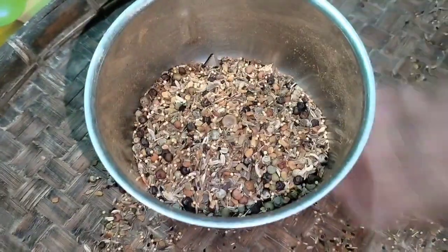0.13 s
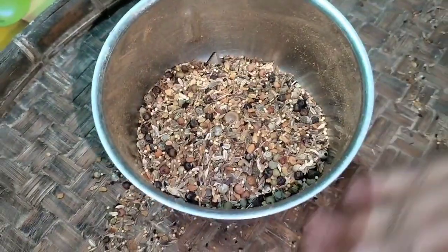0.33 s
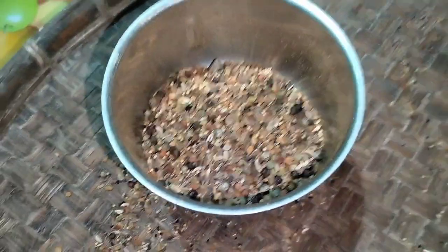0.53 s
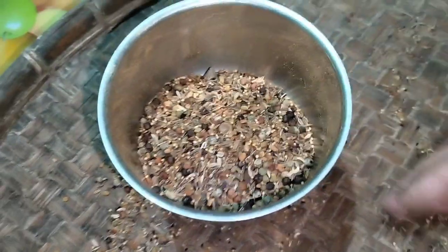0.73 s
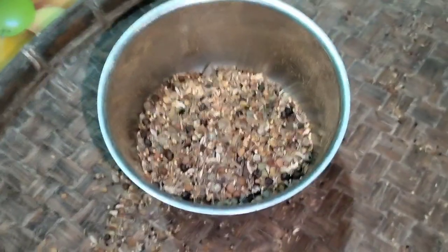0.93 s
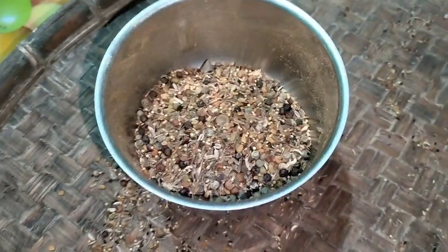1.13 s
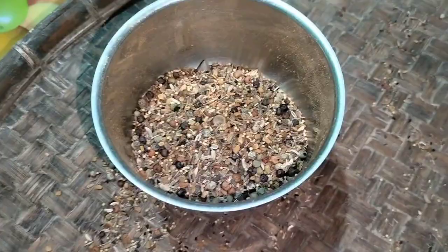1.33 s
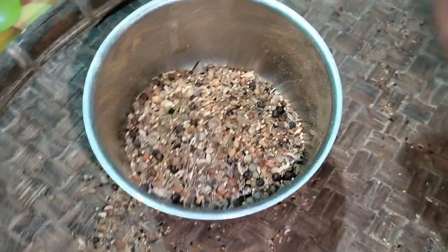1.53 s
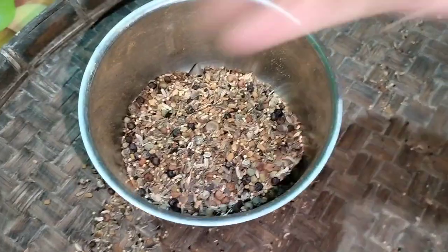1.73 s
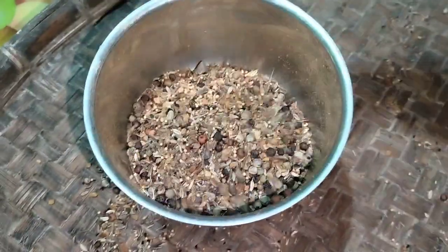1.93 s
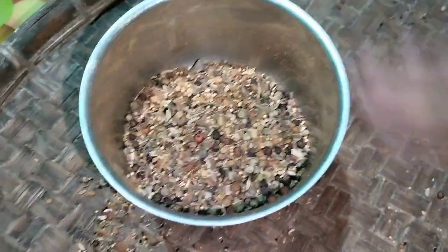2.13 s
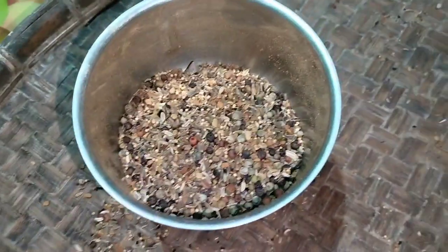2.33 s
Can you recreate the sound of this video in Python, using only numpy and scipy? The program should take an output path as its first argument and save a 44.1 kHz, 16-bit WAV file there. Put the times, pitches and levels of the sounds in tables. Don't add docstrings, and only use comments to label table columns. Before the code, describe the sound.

Dry seeds rustle and scrape in three hand strokes over a woven bamboo tray, stray seeds roll and click, a pinch patters into a ringing steel cup, then another sweep; close stereo in a quiet kitchen.

```python
import sys
import numpy as np
from scipy import signal
from scipy.fft import rfft, irfft
from scipy.io import wavfile
from scipy.ndimage import map_coordinates

SR = 44100
rng = np.random.default_rng(int(sys.argv[2]) if len(sys.argv) > 2 else 0)


def attenuation_scalar(level_db):
    decades = np.asarray(level_db, float) / 20
    return 10 ** decades


def generate_wav(signal):
    frames = np.transpose(np.atleast_2d(signal))
    scaled = np.clip(frames, -1, 1) * 32767
    pcm = np.round(scaled).astype(np.int16)
    wavfile.write(sys.argv[1], SR, pcm)


N = 110117

# (pitch_hz, width_hz, boost_db)
HOLLOWS = [(2470, 320, 4.5), (3920, 670, 8), (5810, 1030, 4.5), (6950, 500, 0.5)]
# (pitch_hz, level_db, time_to_fall_60_db_s)
TRAY_TONES = [(126.7, -7.5, 0.37), (165, 1.5, 0.16), (228, 3, 0.21), (249, -4.5, 0.16), (281, 5, 0.11),
              (353.5, -4, 0.088), (434, -5, 0.072)]
# (pitch_hz, level_db, time_to_fall_60_db_s)
STRIP_TONES = [(573, -3, 0.035), (698, 2.5, 0.065), (859, -5.5, 0.042), (946, 9, 0.046),
               (1065, -6.5, 0.029), (1707, -4, 0.067)]
LEFT_LAG_S = 0.0003


def unit(x):
    return x / np.sqrt(np.mean(x ** 2) + 1e-20)


def along(points, hz):
    f, value = np.transpose(points)
    return np.interp(np.log(hz + 1), np.log(f + 1), value)


def curves(rows):
    time_s, *columns = np.transpose(rows)
    return [np.interp(np.arange(N) / SR, time_s, column, -120, -120) for column in columns]


def wobble(rate):
    knots = rng.standard_normal(int(N * rate / SR) + 4)
    return map_coordinates(knots, [np.arange(N) * rate / SR])


def coloured(x, spectrum, bumps=()):
    hz = np.fft.rfftfreq(4096, 1 / SR)
    db = np.maximum(along(spectrum, hz), -70)
    db = db + sum(boost / (1 + (2 * (hz - centre) / width) ** 2) for centre, width, boost in bumps)
    fold = np.r_[1, 2 * np.ones(2047), 1, np.zeros(2047)]
    cepstrum = irfft(db * np.log(10) / 20) * fold
    response = irfft(np.exp(rfft(cepstrum)))[None, :2048]
    return signal.fftconvolve(x, response, axes=1)[:, :N]


def ringing(modes, attack_s=0.00049):
    t = np.arange(SR // 2) / SR
    ring = np.zeros(len(t))
    for k, (hz, db, t60) in enumerate(modes):
        ring += (-1) ** k * attenuation_scalar(db - 60 * t / t60) * np.sin(2 * np.pi * hz * t)
    return ring * (1 - np.exp(-t / attack_s))


def rung(x, modes):
    return signal.fftconvolve(x, ringing(modes)[None], axes=1)[:, :N]


def contacts(count, spread_db, lag_s=LEFT_LAG_S):
    u = rng.random((count, 4))
    size = attenuation_scalar(-spread_db * np.log(u[:, 1] + 1e-3)) * np.sign(u[:, 2] - 0.5)
    lag = lag_s + 0.0001 * np.tan(2.4 * (u[:, 3] - 0.5))
    both = []
    for delay in (lag, 0 * lag):
        at = np.clip(np.round(u[:, 0] * N + delay * SR).astype(int), 0, N - 1)
        both.append(np.bincount(at, size, N))
    return unit(np.array(both))


def sweep():
    # (time_s, rustle_db, drumming_over_rustle_db, scrape_over_rustle_db)
    strokes = [
        [(0.0, -48.5, -15.5, -11.5), (0.246, -30.5, -8.5, -3), (0.44, -59.5, -7.5, -10)],
        [(0.45, -48.5, -14.5, -8), (0.652, -30, -12, -3.5), (0.85, -51.5, -12, -8)],
        [(0.86, -43, -10, -5.5), (1.08, -32, -1.5, -2), (1.38, -66, -21, -13)],
        [(2.2, -56, -17, -17), (2.286, -37, -10.5, -4), (2.496, -38.5, -5.5, -4.5)],
    ]
    # (pitch_hz, level_db)
    rustle_tone = [(710, -37.5), (1200, -2.5), (1980, -4.5), (2560, -2), (4650, -5), (5840, -6), (7170, -4),
                   (9610, -20), (16000, -23)]
    # (pitch_hz, level_db)
    scrape_tone = [(210, -10.5), (350, -10), (480, -6.5), (861, -2.5), (2200, -12.5), (2860, -30),
                   (4840, -120)]
    db, drum_db, scrape_db = curves(np.concatenate(strokes))
    hand_lifted = np.abs(np.arange(N) / SR - 1.78) < 0.4
    db = np.where(hand_lifted, -120, db)
    weave_db = 2.15 * wobble(15) + 1.11 * wobble(45)

    rustle = unit(coloured(contacts(count=40000, spread_db=2.0), rustle_tone, HOLLOWS))
    rustle = attenuation_scalar(db + weave_db + 3.5) * rustle

    rub = contacts(count=9000, spread_db=3.0, lag_s=0.0001)
    scrape = unit(unit(coloured(rub, scrape_tone)) + 0.67 * unit(rung(rub, STRIP_TONES)))
    scrape = attenuation_scalar(db + scrape_db + weave_db + 1.5 * wobble(30.1) + 1.5) * scrape

    push = contacts(count=1500, spread_db=0.5, lag_s=0.00005)
    push = attenuation_scalar(db + drum_db + 1.9 * wobble(18)) * push
    drum = rung(push, TRAY_TONES) / np.linalg.norm(ringing(TRAY_TONES))
    return rustle + scrape + attenuation_scalar(0.5) * drum


def pour():
    # (time_s, level_db)
    trickle = [
        (1.96, -66.5),
        (2.048, -40.5),
        (2.22, -62.5),
    ]
    # (pitch_hz, level_db)
    patter_tone = [(1800, -51), (2600, -21), (4500, -9), (7200, 1.5), (8500, -6), (9500, -17),
                   (12000, -10.5), (16000, -11.5)]
    # (pitch_hz, level_db, time_to_fall_60_db_s)
    cup_tones = [(2326, 7, .4), (2420, 4.5, 0.32), (2410, -20, .3), (2682, -5, 0.46), (3360, -1, 0.33),
                 (3790, -4.5, 0.29), (4180, -19, 0.35), (4290, 5.5, 0.24), (4980, -3.5, 0.44),
                 (5556, -2, 0.26), (5960, 3.5, 0.36), (6169, -17, 0.42), (6750, -1, 0.2), (7300, -12, .25)]
    db, = curves(trickle)
    hits = attenuation_scalar(db + 1.8 * wobble(40)) * contacts(count=20000, spread_db=3.5)
    steady = contacts(count=20000, spread_db=4)
    patter = coloured(hits, patter_tone) / np.std(coloured(steady, patter_tone))

    weak_hz = np.sort(rng.uniform(3000, 8800, size=36))
    wall = cup_tones + [(hz, -19 + rng.normal(0, 5.3), 0.22) for hz in weak_hz]
    ring = coloured(rung(hits, wall), [(1700, -27), (2250, 2)]) / np.linalg.norm(ringing(wall))

    pan_db = np.clip(-4.5 + 42 * (np.arange(N) / SR - 2), -9, 9)
    return (attenuation_scalar(-1.5) * patter + attenuation_scalar(0.5) * ring) * attenuation_scalar(pan_db * np.array([[0.5], [-0.5]]))


def rolling():
    # (time_s, level_db)
    roll_level = [
        (1.3, -53.5),
        (1.624, -62),
        (1.97, -86.5),
    ]
    # (pitch_hz, level_db)
    roll_tone = [(710, -56), (1200, -25), (2250, -37), (2320, -19), (3700, -5.5), (4310, -8), (16000, -28)]
    db, = curves(roll_level)
    tumble = unit(coloured(contacts(count=9000, spread_db=1.5), roll_tone, HOLLOWS))
    return attenuation_scalar(db + 0.73 * wobble(36.8) + 2.0) * tumble


def clicks():
    # (start_s, peak_db, dullness_0_to_1)
    landings = [(0.0658, -22, 0.2), (0.4914, -22.5, 0.38), (1.1394, -17.5, 0.63), (1.2625, -27.5, 0.35),
                (1.4002, -35.5, 0.4), (1.4245, -36, 0.2), (1.4566, -31.5, 0.16), (1.485, -35, 0.18),
                (1.524, -38, 0.03), (1.5433, -35.5, 0.02), (1.6654, -63, 0.47), (1.7045, -48, 0),
                (1.7214, -46, 0), (1.73, -23.5, 0.18), (1.8018, -44, 0.03), (1.8653, -30.5, 0.22),
                (1.9733, -53.5, 0), (1.984, -41, 0.15), (2.4163, -21.5, 0.35)]
    # (pitch_hz, level_db)
    tick_tone = [(500, -27), (850, -15), (1700, -15.5), (4200, 1), (7000, 1), (9000, -14.5), (12000, -29.5),
                 (16000, -26)]
    x = np.zeros((2, N + SR))
    t = np.arange(SR // 20) / SR
    for start_s, db, dull in landings:
        rattle = 0.2 * rng.standard_normal(len(t) - 1) * attenuation_scalar(-60 * t[1:] / 0.03)
        tick = np.r_[1, rattle]
        soft = 6 * signal.lfilter(*signal.butter(2, 2600, fs=SR), tick)
        tick = np.clip(1 - dull, 0, 1) * tick + np.clip(dull, 0, 1) * soft
        for side, lag in enumerate((LEFT_LAG_S, 0)):
            x[side, round((start_s + lag) * SR):][:len(t)] += attenuation_scalar(db) * tick
    one = np.zeros((1, N))
    one[0, 0] = 1
    return attenuation_scalar(1.5) * coloured(x[:, :N], tick_tone) / np.abs(coloured(one, tick_tone)).max()


def varied(modes):
    return [(hz, db + rng.normal(0, 2.44), t60) for hz, db, t60 in modes]


def knocks():
    # (start_s, peak_db, hardness_db), a hard knock rings the strips more
    taps = [(0.103, -29.5, 5), (0.872, -49, -13), (1.129, -24.5, 2), (1.259, -45.5, -10), (1.359, -54, -4),
            (1.437, -40, -14), (1.519, -52, -10.5), (1.58, -53.5, -21), (2.121, -44.5, 6.5),
            (2.2, -40.5, -11), (2.253, -36, 8), (2.459, -20, -0.5)]
    x = np.zeros(N + SR)
    for start_s, db, hard_db in taps:
        ring = ringing(varied(TRAY_TONES), 0.004)
        ring = ring + attenuation_scalar(hard_db) * ringing(varied(STRIP_TONES), 0.00063)
        x[round(start_s * SR):][:len(ring)] += attenuation_scalar(db - 11.5) * ring
    return x[:N] * attenuation_scalar([[0.8], [-0.8]])


def room(x):
    # (pitch_hz, time_to_fall_60_db_s)
    echo_time = [(200, 0.25), (1500, 0.31), (5000, 0.47), (12000, 0.05)]
    hz, t, z = signal.stft(rng.standard_normal((2, SR // 2)), SR, nperseg=256)
    fade = attenuation_scalar(-60 * t / along(echo_time, hz)[:, None])
    tail = signal.istft(z * fade, SR, nperseg=256)[1][:, :SR // 2]
    t = np.arange(SR // 2) / SR
    scatter = np.diff(rng.standard_normal((2, SR // 2 + 1)), axis=1) * attenuation_scalar(-60 * t / 0.03)
    tail = attenuation_scalar(-11) * tail / np.linalg.norm(tail[0])
    echo = tail + attenuation_scalar(-5) * scatter / np.linalg.norm(scatter[0])
    late = np.pad(x, ((0, 0), (30, 0)))
    return signal.fftconvolve(late, echo, axes=1)[:, :N]


def hush():
    # (pitch_hz, level_db)
    hush_tone = [(35, -52), (60, 5.5), (636, -8), (767, -0.5), (1040, -28), (3580, -14.5), (16000, -26)]
    a, b = rng.standard_normal((2, N))
    air = np.array([a + 0.45 * b, a - 0.46 * b])
    return attenuation_scalar(-73 + 4.5 * wobble(6.77)) * unit(coloured(air, hush_tone))


def scene():
    near = sweep() + rolling() + pour() + clicks() + knocks()
    return near + room(near) + hush()


def roll_off(x):
    return signal.sosfilt(signal.butter(12, 16600, fs=SR, output="sos"), x)


def record(dry):
    # (pitch_hz, level_db)
    mic_tone = [(20, -40), (60, -16), (120, 0), (15700, 0), (15900, -70)]
    # (pitch_hz, width_hz, boost_db)
    mic_dips = [(9630, 560, -10), (10680, 490, -10), (13100, 350, -8.5)]
    mix = coloured(dry, mic_tone, mic_dips)
    return roll_off(mix)


dry = scene()
out = record(dry)
generate_wav(out)
```